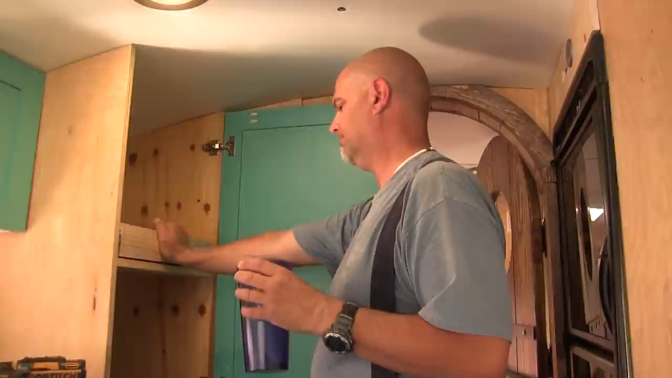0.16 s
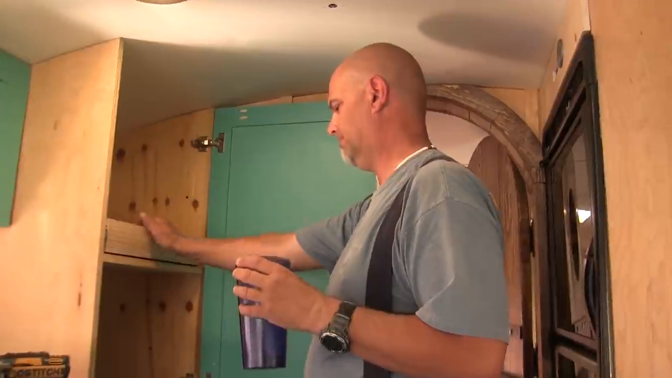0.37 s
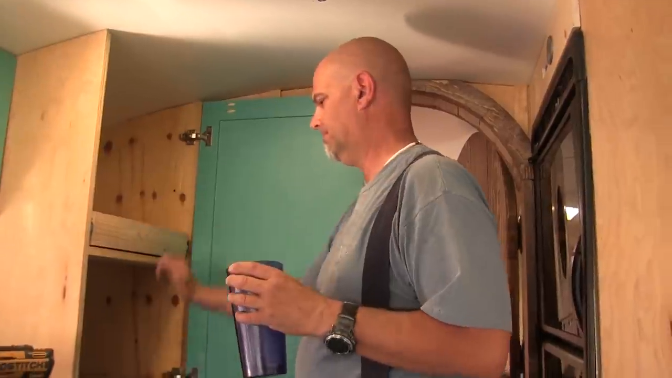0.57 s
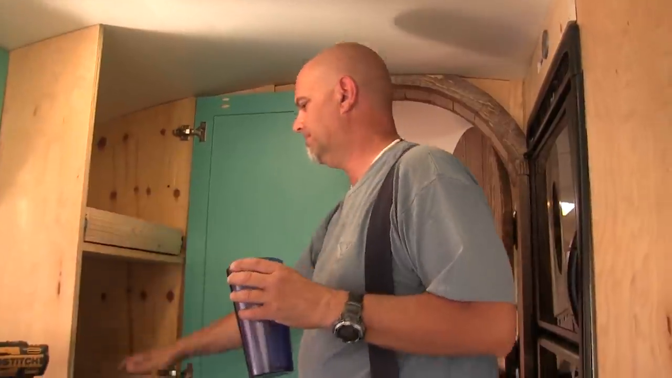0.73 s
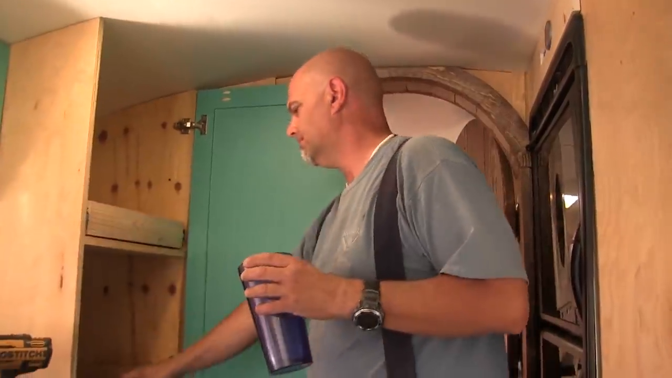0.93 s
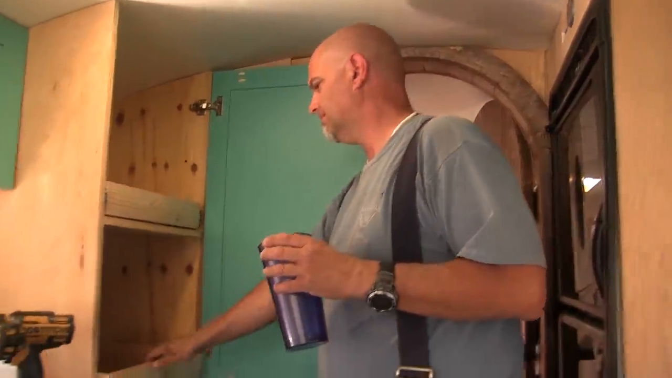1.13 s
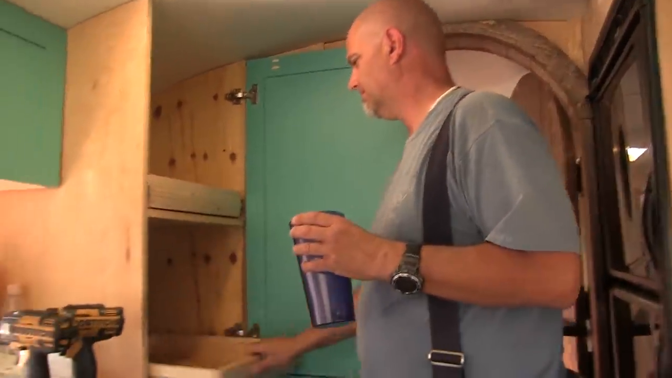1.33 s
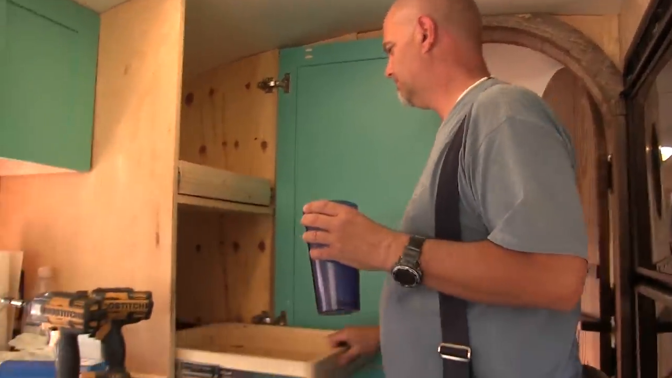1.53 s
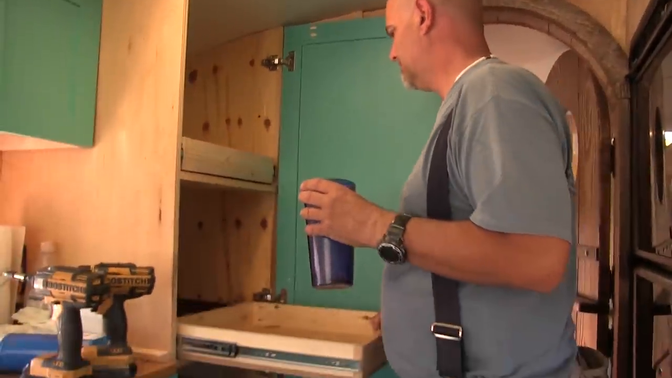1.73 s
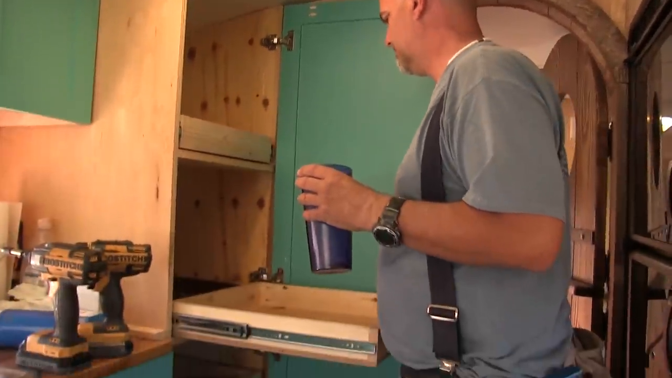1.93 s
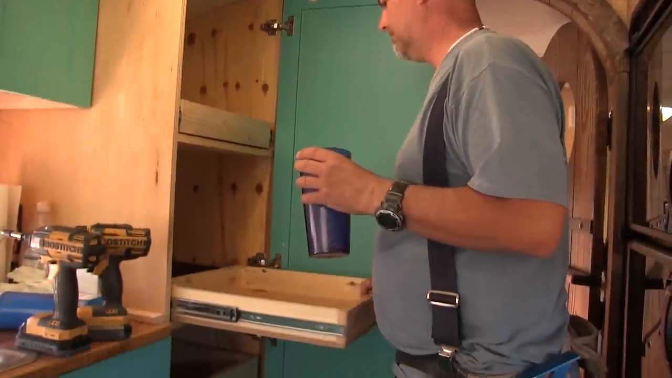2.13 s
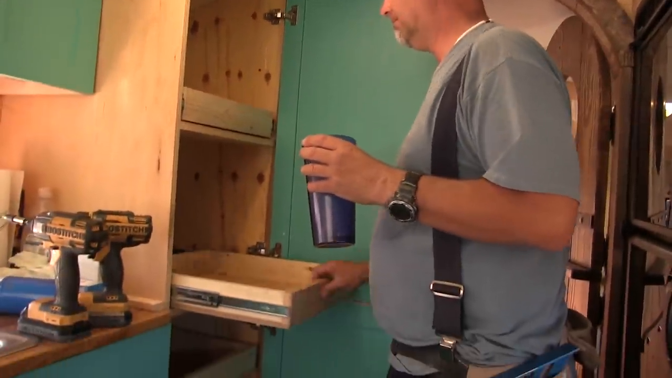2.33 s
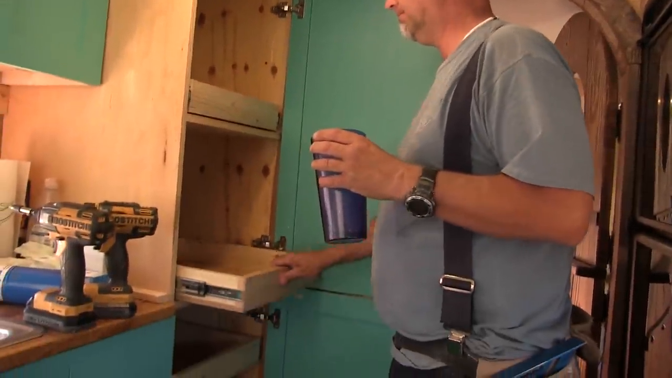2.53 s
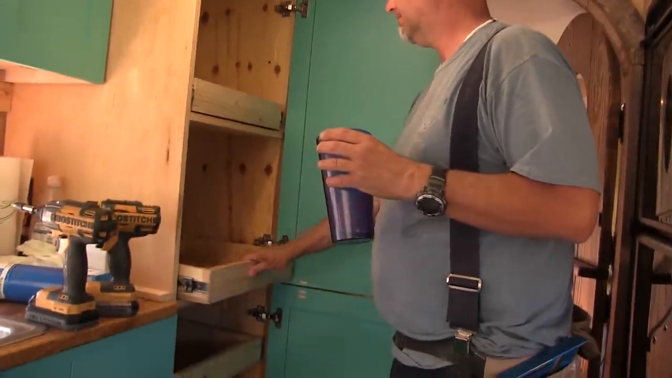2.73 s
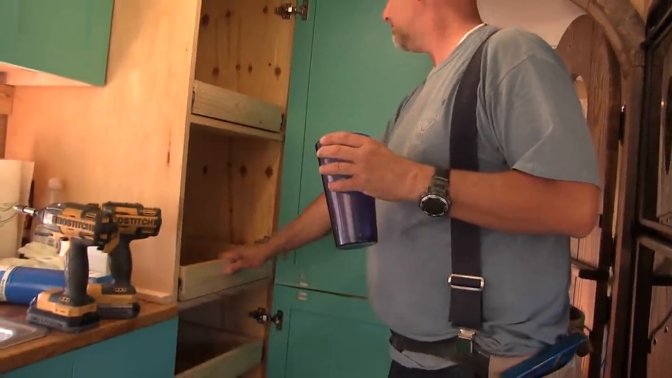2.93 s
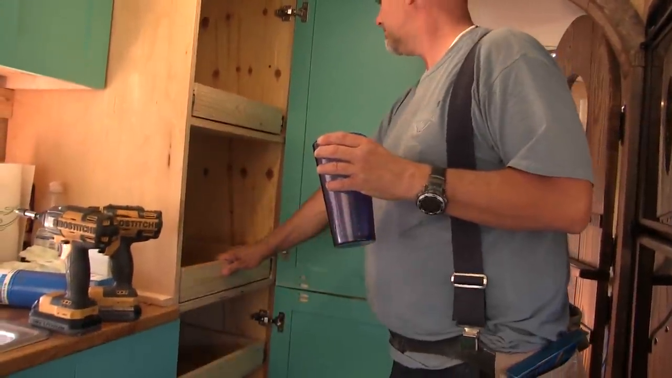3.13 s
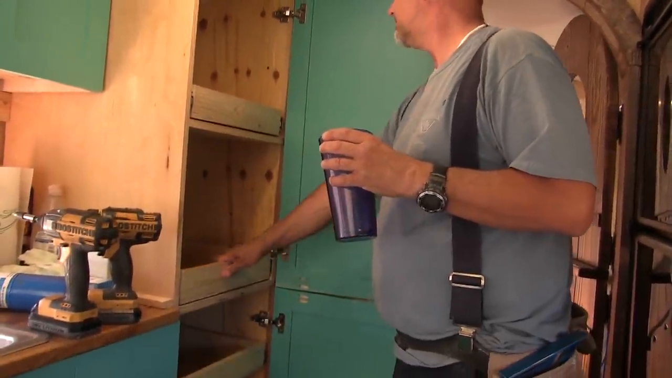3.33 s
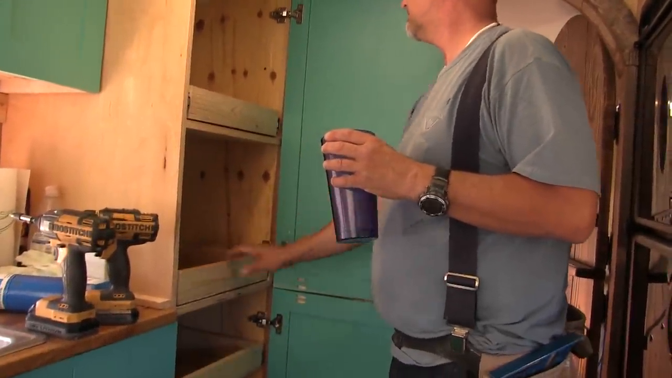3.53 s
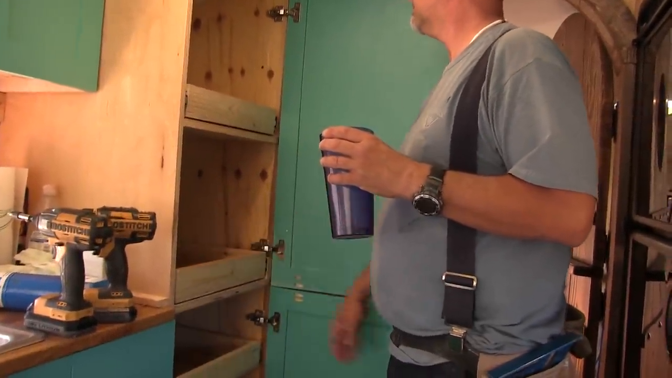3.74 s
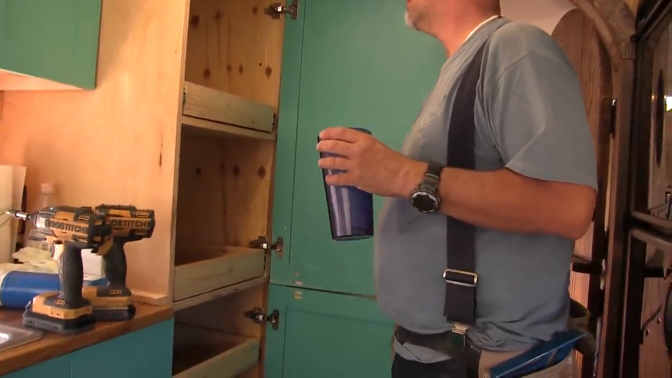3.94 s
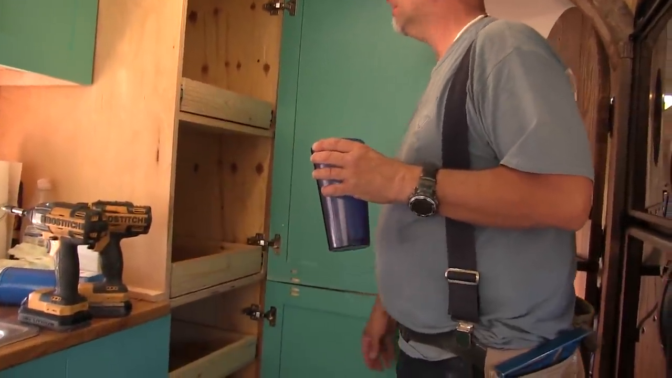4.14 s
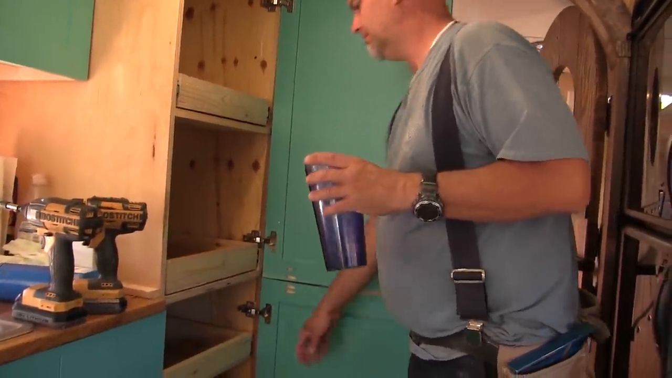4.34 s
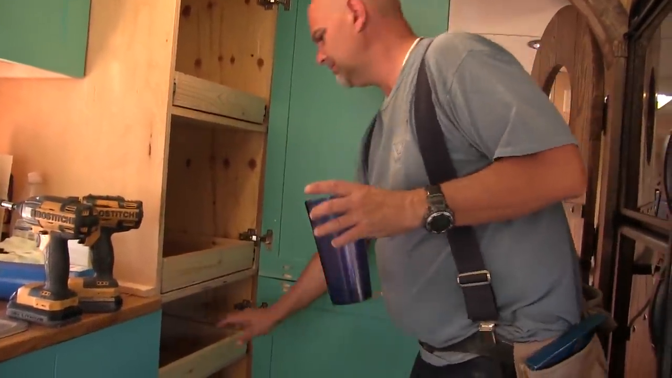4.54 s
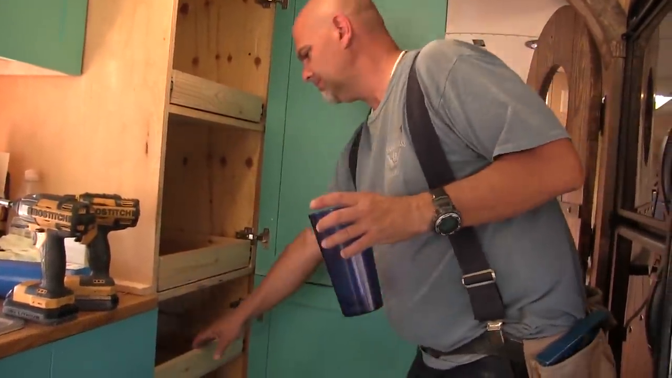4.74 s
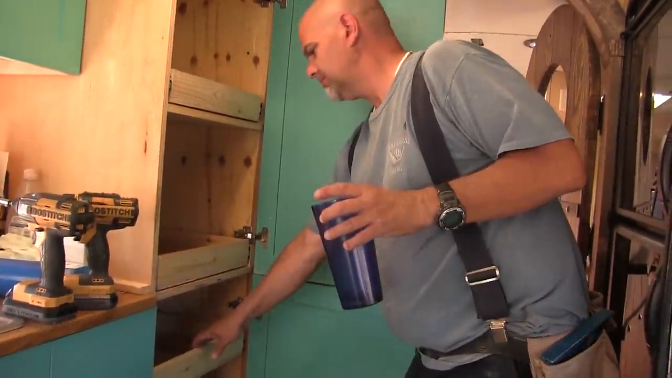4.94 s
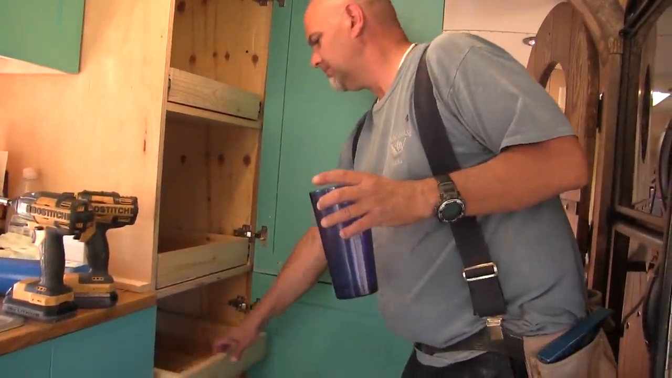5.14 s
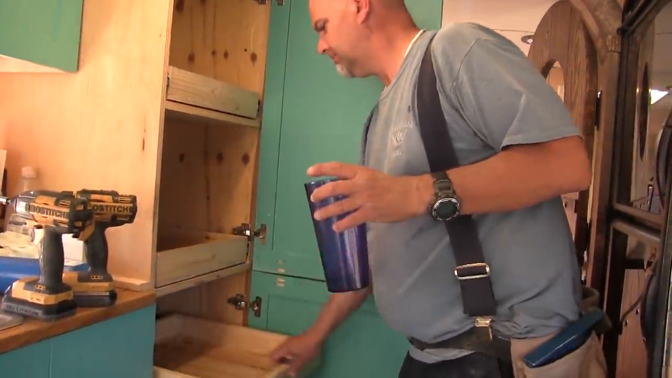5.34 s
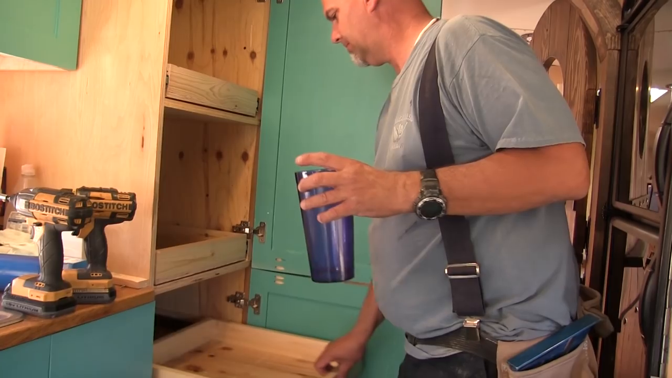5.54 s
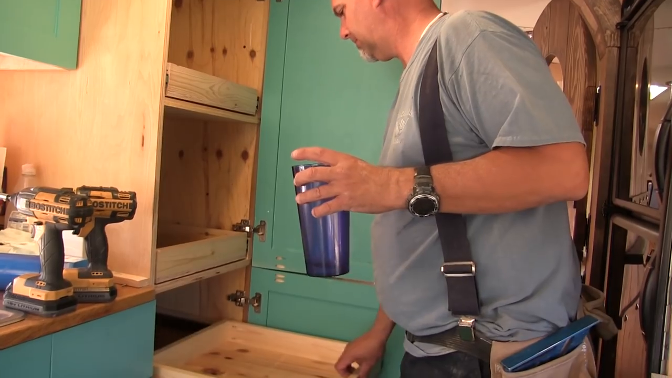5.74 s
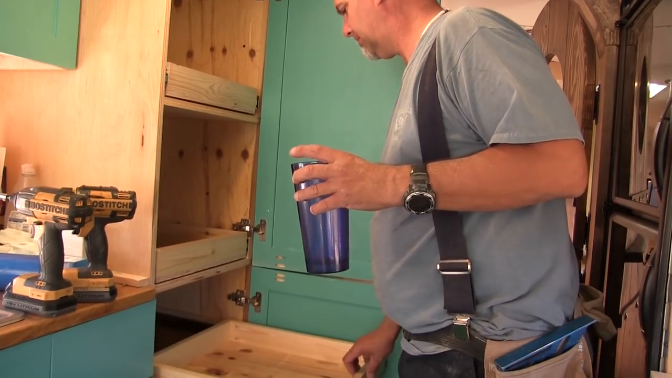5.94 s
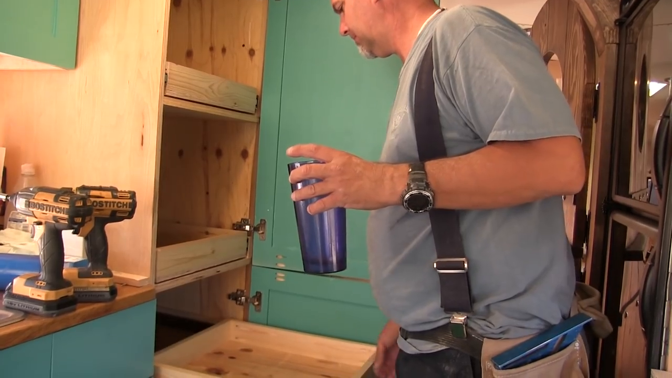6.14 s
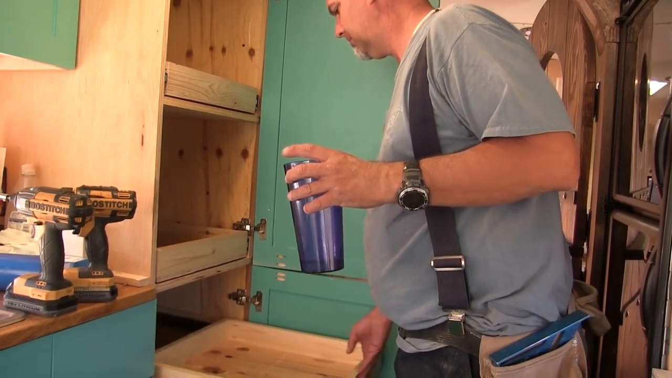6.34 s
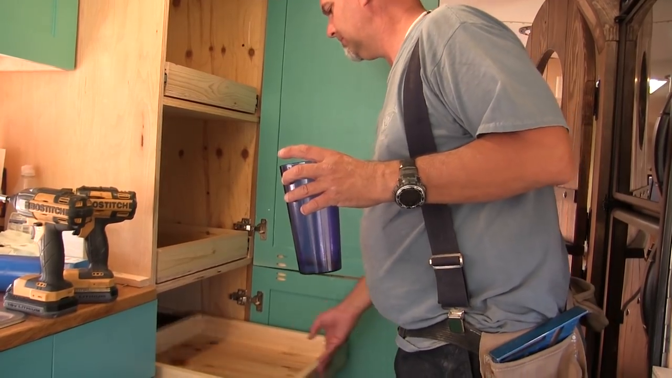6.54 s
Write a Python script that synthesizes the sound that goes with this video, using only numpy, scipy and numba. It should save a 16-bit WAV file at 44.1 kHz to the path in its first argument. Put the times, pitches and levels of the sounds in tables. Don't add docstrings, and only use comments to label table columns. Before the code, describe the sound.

A close, nearly mono camera microphone in a small wooden kitchen, with short dry reverberation, steady soft hiss and faint low floor rumble. At the start there is a faint click and knock, another at 0.3 s, then slight cloth rustle. A clearer steel clack with wooden knocks comes at 0.9-1.0 s. From 1.2 s a plywood shelf rolls out on ball bearings, hollow, grainy and bumpy, ending in bright, loud double steel clacks at 1.8 and 1.89 s. It rolls back more gently from 2.1 s, closing with clicks and woody knocks at 2.97-3.17 s. Faint finger scuffs follow, then quiet until small knocks around 4.8-4.95 s. A clack at 5.2 s releases the second shelf, which rolls out with strong jolts, loudest around 5.3-5.55 s, fading by 5.9 s. Fingers brush and tap wood and a thinly ringing rail end at 6.0-6.35 s; rolling resumes from 6.4 s and continues to the cut near 6.7 s.

```python
import sys
import numpy as np
from scipy import signal
from scipy.fft import rfft, irfft
from scipy.io import wavfile
from scipy.ndimage import uniform_filter1d
from numba import njit

SR = 44100
rng = np.random.default_rng(int(sys.argv[2]) if len(sys.argv) > 2 else 0)


def materialize(psi):
    bounded = np.clip(np.atleast_2d(psi).T, -1, 1)
    quanta = np.round(bounded * 32767).astype(np.int16)
    wavfile.write(sys.argv[1], SR, quanta)


def boost_factor(decibels):
    exponent = np.asarray(decibels, float) / 20
    return 10 ** exponent


N = 294720
T = np.arange(N) / SR


def level(x, db=0):
    return x * boost_factor(db) / np.sqrt(np.mean(x ** 2))


def peak(x, db):
    return x * boost_factor(db) / np.abs(x).max()


def add(out, s, x):
    i = max(int(s * SR), 0)
    out[i:i + len(x)] += x[:N - i]


def colour(x, points, size=8192):
    hz, db = np.transpose(points)
    f = np.fft.rfftfreq(size, 1 / SR) + 1
    log_gain = np.log(boost_factor(np.interp(np.log(f), np.log(hz), db)))
    cepstrum = irfft(log_gain, size)
    cepstrum[1:size // 2] *= 2
    cepstrum[size // 2 + 1:] = 0
    response = irfft(np.exp(rfft(cepstrum)), size)
    return signal.oaconvolve(x, response)[:len(x)]


def soften(x, hz):
    return signal.sosfilt(signal.butter(3, min(hz, 16000), fs=SR, output="sos"), x)


def high_pass(x, order, hz):
    return signal.sosfilt(signal.butter(order, hz, "high", fs=SR, output="sos"), x)


def ring(x, hz, width_hz):
    return signal.lfilter(*signal.iirpeak(hz, hz / max(width_hz, 2), SR), x)


def decay_width(t60):
    return np.log(1000) / np.pi / t60


def body(x, modes, widen=4.0):
    total = 0
    for k, (hz, width, db) in enumerate(modes):
        total = total + (-1) ** k * boost_factor(db) * ring(x, hz, width * widen)
    return level(total)


@njit
def sweep(x, hz, k):
    y, band, low = np.empty(len(x)), 0., 0.
    for i in range(len(x)):
        g = np.tan(np.pi * hz[i] / SR)
        v = (band + g * (x[i] - low)) / (1 + g * (g + k))
        band = 2 * v - band
        low += 2 * g * v
        y[i] = k * v
    return y


def bumps(rate, spread_db, smooth):
    when, size, bed = rng.random(N), rng.exponential(size=N), rng.standard_normal(N)
    hits = (when < rate / SR) * boost_factor(spread_db * np.minimum(size, 3.5))
    return level(hits - hits.mean()) + smooth * bed


def walk(rate):
    k = int(SR / rate)
    steps = np.repeat(rng.standard_normal(N // k + 1), k)
    return 1.3 * uniform_filter1d(uniform_filter1d(steps, k), k)[:N]


def burst(noise, ms, rise_ms, tail_db=-60, tail_ms=30):
    t = 1000 * T[:len(noise)]
    fall = np.exp(-(t / max(ms, .5)) ** 0.57) + boost_factor(tail_db) * np.exp(-t / tail_ms)
    return noise * np.minimum(t / rise_ms, 1) * fall


def hump(s, length):
    return np.exp(-((T - s) / length) ** 2)


def swells(events):
    return sum(db * hump(s, length) for s, db, length in events)


def force(table):
    s, db, _ = np.transpose(table)
    return np.interp(T, s, db, -120, -120)


# (f/Hz, level/dB per Hz)
HOUSE_TONE = [(8.8, -7), (15, -13), (38, -6.5), (66, -10.5), (80, 0.5), (98, -6), (155, -12), (173, -15),
              (237, -19.5), (265, -34), (368, -49), (400, -17.5), (520, -41), (880, -120)]
# (t/s, peak level/dB, length/s)
CREAKS = [(0.0, -37, 0.043), (0.337, -54.5, 0.37), (0.554, -70, 0.079), (0.707, -56, 0.035),
          (0.914, -54, 0.031), (1.057, -56, 0.12), (2.093, -44, 0.034), (3.144, -40.5, 0.081),
          (3.342, -59, 0.1), (3.518, -57, 0.034), (3.65, -47.5, 0.03), (3.803, -62, 0.041),
          (4.006, -51, 0.045), (4.14, -60, 0.03), (4.327, -64, 0.036), (4.552, -51, 0.034),
          (4.704, -51, 0.056), (4.84, -57, 0.056), (5.168, -42, 0.069), (5.525, -38, 0.034),
          (5.83, -43.5, 0.097), (6.19, -66, 0.012)]
# (f/Hz, level/dB per Hz)
AIR = [(150, -20), (250, 0), (500, -3), (1000, -7), (2000, -10), (4000, -12), (8000, -15.5), (15700, -18.5),
       (16500, -40)]
HOUSE_DB, AIR_DB = -64.5, -56.2
SHAKE_DB, SHAKE_SLOPE = -56, 0.23


def house():
    unrest_db = 2.5 * walk(9)
    swell = boost_factor(HOUSE_DB) + sum(boost_factor(db) * hump(s, length) for s, db, length in CREAKS)
    swell = swell + sum(boost_factor(SHAKE_DB + SHAKE_SLOPE * (force(table) - FULL_DB)) for table in TRAVELS)
    rumble = level(colour(rng.standard_normal(N), HOUSE_TONE)) * swell * boost_factor(unrest_db)
    return rumble + level(colour(rng.standard_normal(N), AIR), AIR_DB)


# (f/Hz, level/dB per Hz)
PORT_HISS = [(12, -42), (20, -19), (70, 10.5), (134, -4), (328, -6.5), (388, -5), (3950, -4.5), (13900, -7),
             (16000, -12)]


def port_hiss():
    return level(colour(rng.standard_normal(N), PORT_HISS), -59)


# (t/s, level/dB)
SLEEVE = [
    (0.0, -54),
    (0.22, -88),
    (0.706, -58.5),
    (0.912, -54),
    (1.0, -52),
]


def sleeve():
    grains = bumps(3400.0, 3.4, 0.99)
    return level(ring(grains, 1440, 2500)) * boost_factor(np.interp(T, *np.transpose(SLEEVE), -120, -120))


# (t/s, peak level/dB, ring f/Hz, top tick relative level/dB, rattle/ms)
CLICKS = [(0.002, -37.5, 1260, -40, 34), (0.3, -56, 2370, -14, 6), (0.3103, -42.5, 1440, -37, 3.2),
          (0.9217, -20, 1280, -18, 8.8), (0.9945, -29, 1940, -13, 26), (1.175, -33.5, 1530, -10, 14),
          (1.8028, -16.5, 4300, -14, 5.2), (1.807, -12.5, 3470, -15, 12), (1.8858, -13.5, 2300, -28, 1.5),
          (1.88, -13, 2380, -17, 2.7), (1.8913, -18, 2460, -19, 2), (2.328, -32.5, 1280, -10, 21),
          (2.963, -29, 2760, 0, 5.7), (2.9848, -17, 1530, -10, 6.5), (3.0375, -22.5, 2760, -17, 2.9),
          (3.115, -31, 2430, -9, 18), (3.132, -23.5, 1780, -35, 14), (1.82, -23.5, 3800, -30, 44),
          (3.141, -36, 1000, -40, 25), (4.9002, -42, 2830, -34, 6.7), (4.936, -29.5, 1290, -6, 20),
          (5.12, -29, 1380, -17, 13), (5.218, -15, 1530, -40, 3.3), (5.449, -22.5, 4370, -17, 20),
          (6.1145, -33, 2210, -35, 5.2), (6.335, -37, 2510, -6, 4.7)]


def clicks():
    out = np.zeros(N)
    for (s, db, hz, tick_db, ms), noise in zip(CLICKS, rng.standard_normal((len(CLICKS), 2, 8000))):
        soft = max(-16.5 - db, 0) / 30
        knots = np.abs(np.repeat(noise[1, :200], 40))
        grains = noise[0] * (8.5 + knots)
        blow = burst(grains, ms, rise_ms=0.48 + 7.6 * soft ** 2, tail_db=-0.5, tail_ms=14.1)
        broad = ring(ring(blow, 1270, 2170), 2320, 6600)
        main = ring(ring(blow, hz, 0.16 * hz), hz, 0.59 * hz)
        steel = broad + 0.91 * main + 0.15 * ring(blow, 3.0 * hz, 400)
        tick = burst(noise[1], 0.21 * ms, rise_ms=0.42, tail_db=-16, tail_ms=17)
        tick = soften(tick, 13400) - soften(tick, 3700)
        add(out, s, peak(soften(steel, 5800 - 1500 * soft), db) + peak(tick, db + tick_db))
    return out


# (t/s, peak level/dB, ring f/Hz, ring t60/s, thud relative level/dB)
KNOCKS = [(0.004, -33, 358, 0.007, -3), (0.31, -48.5, 820, 0.0084, 3), (0.925, -23, 830, 0.015, -16.5),
          (0.933, -24.5, 434, 0.016, -16), (0.997, -25.5, 920, 0.013, -7), (1.025, -34, 690, 0.013, -23),
          (1.887, -20, 1036, 0.025, -25), (2.967, -22, 980, 0.02, -11), (3.04, -26, 396, 0.062, -21),
          (3.132, -17, 569, 0.013, -17.5), (3.16, -24.5, 690, 0.013, -7), (3.397, -44.5, 423, 0.032, -12),
          (3.175, -33, 495, 0.012, -8.5), (4.805, -32, 483, 0.0086, 2.5), (4.806, -39, 212, 0.051, -6),
          (4.823, -34.5, 127, 0.067, -2.5), (4.905, -36.5, 880, 0.024, -26), (4.94, -36, 470, 0.0079, -8),
          (5.122, -28.5, 533, 0.025, -2), (5.221, -19, 610, 0.013, -10), (6.107, -29.5, 603, 0.15, -30),
          (6.115, -31.5, 990, 0.022, -37), (6.132, -37, 612, 0.082, -34), (6.185, -51, 620, 0.049, -32),
          (6.333, -36, 514, 0.029, -13)]
# (frequency ratio, damping ratio, level/dB)
WOOD_MODES = [(1, 1, 0), (1.393, 2.1, -13), (2.1, 4.4, -17), (.786, 3, -14)]
THUD_HZ = 170


def knocks():
    out = np.zeros(N)
    for (s, db, hz, t60, thud_db), noise in zip(KNOCKS, rng.standard_normal((len(KNOCKS), 9000))):
        blow = soften(burst(noise, 7., rise_ms=3.5, tail_db=-20, tail_ms=18), 2.5 * hz)
        width = decay_width(max(t60, .01)) * max(hz / 600, 1) ** 3
        wood = 0
        for ratio, damp, mode_db in WOOD_MODES:
            mode_hz = ratio * hz
            wood = wood + peak(ring(ring(blow, mode_hz, .4 * hz), mode_hz, damp * width), mode_db)
        long_push = burst(noise[::-1], 11.2, rise_ms=3.9)
        thud = ring(ring(long_push, THUD_HZ, 67), THUD_HZ, 350)
        add(out, s, peak(wood, db) + peak(thud, db + thud_db))
    return out


# (t/s, rolling force level/dB, board resonance f/Hz)
TRAVELS = [
    [(1.165, -43, 480), (1.233, -33.5, 473), (1.451, -23.5, 468), (1.569, -24, 560), (1.589, -26, 465),
     (1.669, -21, 420), (1.681, -24, 443), (1.775, -25.5, 450), (1.81, -31, 435), (1.919, -29, 363),
     (2.06, -64, 430)],
    [(2.105, -19, 447), (2.149, -31.5, 404), (2.267, -25, 428), (2.613, -28, 460), (2.625, -28, 470),
     (2.691, -34.5, 412), (2.957, -40, 550), (3.055, -30, 443), (3.11, -55, 471)],
    [(5.11, -53, 481), (5.132, -42, 417), (5.206, -31.5, 484), (5.344, -27.5, 456), (5.416, -17.5, 463),
     (5.452, -24, 514), (5.65, -28.5, 487), (5.68, -29.5, 450), (5.842, -43, 420), (6.0, -64, 479)],
    [(6.35, -39, 487), (6.38, -47, 484), (6.452, -32, 450), (6.482, -30.5, 450), (6.53, -29.5, 423),
     (6.62, -27, 530), (6.664, -22.5, 454), (6.68, -25, 470)],
]
# (boom level/dB, rail chatter level/dB, upper modes level/dB,
# brightening from start to end/dB, growth of the top hiss/dB)
LOADS = [
    (-7.5, -20.5, -9, -9.5, 5),
    (-6.5, -20, -8.5, 5.5, 2),
    (-6.5, -19.5, -6, -18, 23),
    (-6.5, -19, -7, 9, -17),
]
# (f/Hz, level/dB per Hz)
BOARDS = [
    [(150, -29), (260, -18), (386, -6.5), (419, 1), (451, -18.5), (481, 0.5), (518, -5.5), (613, -4.5),
     (645, -7.5), (787, -3.5), (966, -8.5), (1200, -15), (1500, -12.5), (1950, -8), (3300, -120)],
    [(150, -55), (260, -11), (339, -5), (372, -7), (419, -9), (518, -9.5), (553, -6), (595, -3),
     (641, -8.5), (742, -8), (853, -6.5), (1240, -15.5), (1500, -12), (1950, -10), (3300, -120)],
]
# (f/Hz, level/dB per Hz)
BOOMS = [
    [(41, -91), (70, -28), (145, 2), (172, -2), (209, 7), (268, -11), (290, -3), (380, -1.5), (640, -120)],
    [(41, -38), (70, -13), (150, -3), (189, 2.5), (231, 4.5), (264, -9), (290, -6.5), (380, -45),
     (640, -120)],
]
# (f/Hz, level/dB per Hz)
RAILS = [
    [(760, -40), (1300, -3.5), (1620, 5.5), (2040, -2), (2850, -4.5), (5270, -18.5), (6090, -15),
     (10000, -28.5), (13000, -42), (22000, -120)],
    [(760, -25.5), (1300, -30), (1430, 0), (2280, -4), (3200, -5.5), (3600, -11.5), (5410, -17),
     (6470, -17), (10000, -29.5), (13000, -41), (22000, -120)],
]
# (t/s, board swell/dB, boom swell/dB, length/s)
LURCHES = [(1.464, 4.5, -15, 0.01), (1.667, 1.5, -6, 0.0084), (1.89, -7, 6.5, 0.013), (2.242, -1, 6, 0.06),
           (2.78, 4, 7, 0.077), (3.053, -2, -2.5, 0.028), (5.186, 11.5, 8.5, 0.09), (5.221, 7, 4, 0.013),
           (5.416, 4, 8, 0.01), (5.477, -3.5, -1.5, 0.066), (5.608, 5, -4.5, 0.12), (5.754, 3, 4, 0.036),
           (6.548, 2.5, 11.5, 0.025), (1.31, 0.5, 0, .08), (6.42, 0, 1, 0.039), (2.503, 0.5, 0, 0.13),
           (5.954, -3, -6, .06)]
# (t/s, chatter swell/dB, length/s)
SPURTS = [(1.2, 1, 0.045), (1.35, 0, 0.056), (1.503, 0, 0.11), (1.716, -1.5, 0.073), (2.157, -4, 0.056),
          (2.328, 1.5, .06), (2.55, 0.5, 0.093), (2.805, -0.5, .1), (2.93, -1.5, 0.035), (5.15, 0, .03),
          (5.187, 3, .03), (5.287, 4.5, 0.033), (5.393, 0.5, .04), (5.557, 1, .07), (5.727, 1.5, 0.044),
          (5.86, -8, 0.093), (6.425, -4, 0.055), (6.55, -0.5, .05), (6.654, -0.5, .04)]
FULL_DB = -20
BOOM_SLOPE, RAIL_SLOPE, UPPER_SLOPE = 0.69, 0.38, 0.75
START_S = .045


def travels():
    balls = bumps(900., 1.84, 1.0) * boost_factor(1.27 * walk(25))
    grit = bumps(1100., 3.2, 0.7) * boost_factor(2.3 * walk(30)) + 0.55 * balls
    boards = [level(colour(balls, points)) for points in BOARDS]
    booms = [level(colour(balls, points)) for points in BOOMS]
    rails = [level(colour(grit, points)) for points in RAILS]
    board_lurch = swells((s, db, length) for s, db, _, length in LURCHES)
    boom_lurch = swells((s, db, length) for s, _, db, length in LURCHES)
    spurt = swells(SPURTS)
    out = 0
    for k, (table, load) in enumerate(zip(TRAVELS, LOADS)):
        boom_db, rail_db, upper_db, brighten_db, hiss_db = load
        shelf = k // 2
        s, _, hz = np.transpose(table)
        push = force(table) - FULL_DB
        rolling = np.clip((T - s[0]) / START_S, 0, 1) ** 2 * (T < s[-1])
        along = np.interp(T, [s[0], s[-1]], [0, 1]) - .5
        bright = brighten_db * along

        lower = soften(boards[shelf], 647)
        lower = level(0.19 * lower + 2.5 * sweep(lower, np.interp(T, s, hz), 0.33))
        upper = level(ring(ring(boards[shelf], 1114, 610), 1047, 940))
        upper_gain = boost_factor(upper_db + UPPER_SLOPE * push + bright + 0.3 * spurt)
        board = boost_factor(push + board_lurch) * lower + upper_gain * upper

        boom = boost_factor(boom_db + BOOM_SLOPE * push + boom_lurch) * booms[shelf]

        dull = soften(rails[shelf], 5400)
        top_hiss = soften(soften(rails[shelf] - dull, 13000), 13000)
        chatter = dull + boost_factor(hiss_db * along - 2.5) * top_hiss
        rail = boost_factor(rail_db + RAIL_SLOPE * push + bright + spurt) * chatter
        out = out + boost_factor(FULL_DB) * rolling * (board + boom + rail)
    return out


# (t/s, peak level/dB, board ring f/Hz)
JOLTS = [(1.233, -26, 490), (1.337, -17, 460), (1.377, -16.5, 490), (1.441, -21, 446), (1.46, -15, 480),
         (1.494, -25, 476), (1.531, -11.5, 730), (1.553, -11.5, 475), (1.614, -13, 470), (1.66, -17, 430),
         (1.719, -18.5, 414), (1.749, -24, 480), (1.783, -36, 450), (1.868, -14, 496), (2.198, -24, 433),
         (2.234, -40, 363), (2.27, -20.5, 445), (2.292, -26, 427), (2.339, -24, 430), (2.399, -31, 440),
         (2.43, -17, 397), (2.547, -18, 476), (2.6, -21, 400), (2.675, -16, 407), (5.159, -23, 503),
         (5.204, -23, 590), (5.242, -27, 600), (5.279, -11.5, 410), (5.319, -12.5, 603),
         (5.351, -16.5, 514), (5.388, -8.5, 367), (5.41, -13, 490), (5.43, -28, 514), (5.47, -15, 503),
         (5.502, -6.5, 614), (5.529, -13.5, 430), (5.561, -15, 493), (5.599, -25, 460), (5.639, -19, 520),
         (5.719, -21, 454), (6.409, -47, 503), (6.447, -21, 505), (6.504, -17.5, 572), (6.52, -16, 377),
         (6.537, -18, 390), (6.557, -21, 412), (6.582, -13, 490), (6.61, -14.5, 500), (6.639, -10.5, 513)]
JOLT_DB, JOLT_EDGE_DB = -6.5, -15


def jolts():
    out = np.zeros(N)
    for (s, db, hz), noise in zip(JOLTS, rng.standard_normal((len(JOLTS), 3000))):
        push = burst(noise, 4.3, rise_ms=2.9)
        board = ring(ring(push, hz, 0.13 * hz), hz, 1.8 * hz)
        scrape = burst(noise, 9.9, rise_ms=1.2)
        edge = soften(ring(ring(scrape, 2340, 1200), 2300, 1700), 3100)
        add(out, s, peak(board, db + JOLT_DB) + peak(edge, db + JOLT_DB + JOLT_EDGE_DB))
    return out


# (t/s, peak level/dB, ring f/Hz, t60/s)
SNAPS = [(1.8037, -12.5, 3980, 0.011), (1.8105, -18, 3200, 0.0085), (1.8128, -20, 4330, .02),
         (1.8812, -23, 3340, 0.0049), (1.885, -13, 2700, 0.01), (1.8878, -19, 2530, .008),
         (1.8922, -13, 2720, 0.0059), (1.898, -17.5, 1550, .02), (2.97, -29, 990, 0.015),
         (2.9857, -29, 3400, 0.0088), (2.9907, -27, 1580, 0.024), (3.0375, -28, 2900, 0.014),
         (3.039, -21.5, 2120, 0.016), (3.12, -27, 1450, .015), (3.134, -17, 560, .07),
         (3.141, -18.5, 560, 0.069), (3.1409, -22, 1060, .012), (3.1446, -21, 1310, .012),
         (3.149, -23, 800, .015), (3.165, -25, 1000, 0.017), (4.937, -36, 1500, 0.011),
         (5.218, -37, 4680, 0.0039), (5.226, -16, 1100, 0.0047)]


def snaps():
    out, hit = np.zeros(N), np.zeros(3000)
    hit[0] = 1
    edge = soften(ring(ring(hit, 2800, 4000), 3000, 5000), 7500)
    for s, db, hz, t60 in SNAPS:
        mode = ring(ring(hit, hz, 1.8 * hz), hz, decay_width(max(t60, .002)))
        add(out, s, peak(soften(mode, 7800), db) + peak(edge, db - 16.5))
    return out


def skin_slip():
    return soften(bumps(2500., 0.34, 1.0), 9500)


# (start t/s, rise/s, hold/s, release/s, level/dB)
SCUFFS = [
    (3.275, 0.022, 0.12, 0.017, -73),
    (3.395, 0.025, 0.037, 0.088, -63.5),
    (5.993, 0.041, 0.052, 0.014, -63.5),
    (6.088, 0.0074, 0.015, 0.038, -57.5),
    (4.792, .008, 0.022, 0.072, -60),
    (4.888, 0.0066, 0.026, 0.024, -62),
    (2.112, 0.0051, .01, .03, -63),
    (2.3, 0.017, .005, .01, -55),
]
SCUFF_HIGH_DB = [6, 5.5, 10, -5, -3, -4, 4, 3]
# (f/Hz, width/Hz, level/dB)
FRONT = [(597, 30, 15), (980, 37, -6), (1280, 540, -1), (2120, 300, -12.5), (3850, 90, -5.5),
         (5040, 1100, -19), (1530, 44, -11), (2480, 79, -19)]


def scuffs():
    skin = skin_slip()
    low_haze = level(ring(ring(skin, 860, 1300), 1200, 900))
    low = level(body(skin, FRONT[:3], widen=10.0) + 0.2 * low_haze)
    high_haze = level(ring(ring(skin, 3500, 5000), 3500, 5000))
    high = level(body(skin, FRONT[3:6], widen=1.3) + .5 * high_haze)
    low, high = 5.4 * high_pass(low, 2, 450), soften(high, 7100)
    out = 0
    for (s, rise, hold, release, db), high_db in zip(SCUFFS, SCUFF_HIGH_DB):
        press = np.interp(T, np.cumsum([s, rise, hold, release]), [0, 1, 1, 0]) ** 2
        out = out + boost_factor(db) * press * (low + boost_factor(high_db) * high)
    return out


# (t/s, pressure level/dB)
STROKE = [
    (6.015, -78),
    (6.035, -47),
    (6.1, -46),
    (6.108, -50),
    (6.113, -45),
    (6.125, -49),
    (6.14, -56),
    (6.18, -70),
    (6.187, -56),
    (6.2, -80),
]
# (f/Hz, width/Hz, level/dB)
RAIL_END = [(603, 16, 0), (920, 31, 1), (1020, 33, -5), (1270, 20, -7), (1970, 40, -10), (2300, 26, -4),
            (2550, 40, -4), (3080, 40, -9), (3760, 45, -4.5), (4080, 65, -9), (5200, 84, -11)]


def rail_stroke():
    pressure = boost_factor(np.interp(T, *np.transpose(STROKE), -120, -120))
    rub = level(skin_slip()) * pressure
    out = 0
    for hz, width, db in RAIL_END:
        out = out + boost_factor(db) * ring(ring(rub, hz, 0.15 * hz), hz, width)
    return boost_factor(17.5) * out


# (t/s, peak level/dB, f/Hz, t60/s)
PINGS = [
    (6.106, -34, 2450, 0.1),
    (6.116, -32.5, 2200, .1),
    (6.123, -38, 1297, 0.12),
    (6.291, -43, 2580, 0.005),
    (6.3365, -40, 2460, 0.09),
]


def pings():
    out = np.zeros(N)
    for (s, db, hz, t60), noise in zip(PINGS, rng.standard_normal((len(PINGS), 9000))):
        touch = burst(noise, 1.5, rise_ms=0.88)
        add(out, s, peak(ring(ring(touch, hz, 550), hz, decay_width(t60)), db))
    return out


# (t/s, peak level/dB, push/ms)
TAPS = [
    (6.107, -28, 7.8),
    (6.336, -42, 20),
]


def taps():
    out = np.zeros(N)
    for (s, db, ms), noise in zip(TAPS, rng.standard_normal((len(TAPS), 9000))):
        tap = body(burst(noise, ms, rise_ms=1.3), FRONT, widen=0.38)
        add(out, s, peak(high_pass(tap, 4, 520), db))
    return out


def kitchen(x, t60_low=0.22, t60_high=0.12, wet_db=-17):
    t, noise = T[:SR // 2], rng.standard_normal(SR // 2)
    low = signal.lfilter(*signal.butter(1, 1500, fs=SR), noise)
    tail = low * boost_factor(-60 * t / t60_low) + (noise - low) * boost_factor(-60 * t / t60_high)
    tail = tail * np.minimum(t / 0.014, 1)
    return x + boost_factor(wet_db) * signal.fftconvolve(x, tail / np.sqrt(np.sum(tail ** 2)))[:N]


def scene():
    handling = sleeve() + scuffs() + rail_stroke() + pings() + taps()
    shelves = clicks() + knocks() + boost_factor(-1.0) * travels() + jolts() + snaps()
    mid = kitchen(handling + shelves) + house()
    side = port_hiss()
    return np.array([mid + side, mid - side])


def roll_off(x):
    return signal.sosfilt(signal.butter(12, 16380, fs=SR, output="sos"), x)


def record(dry):
    return roll_off(dry)


dry = scene()
out = record(dry)
materialize(out)
```